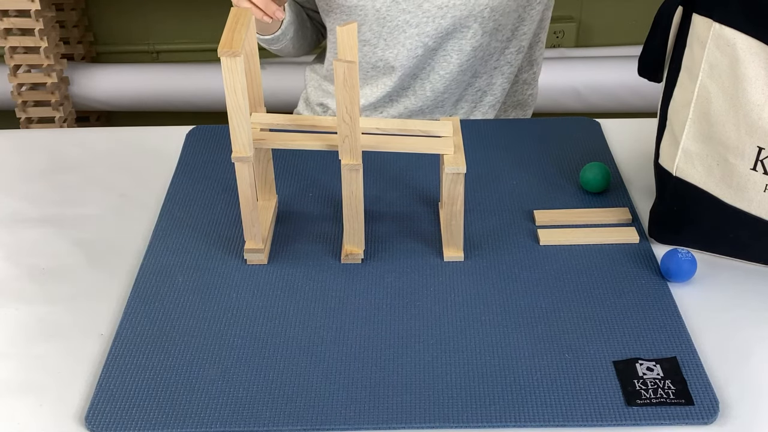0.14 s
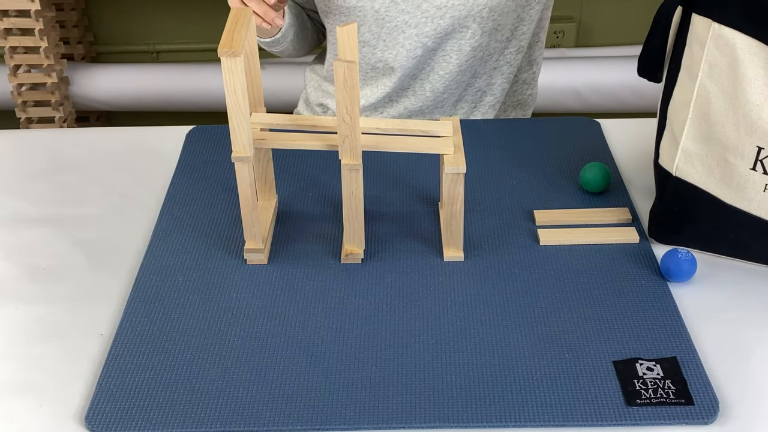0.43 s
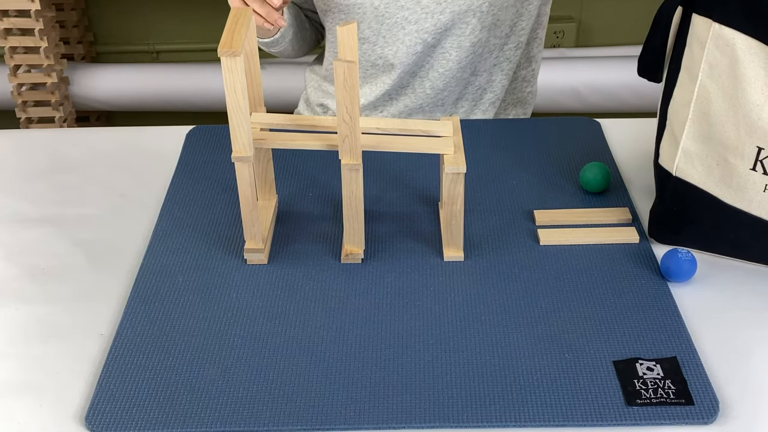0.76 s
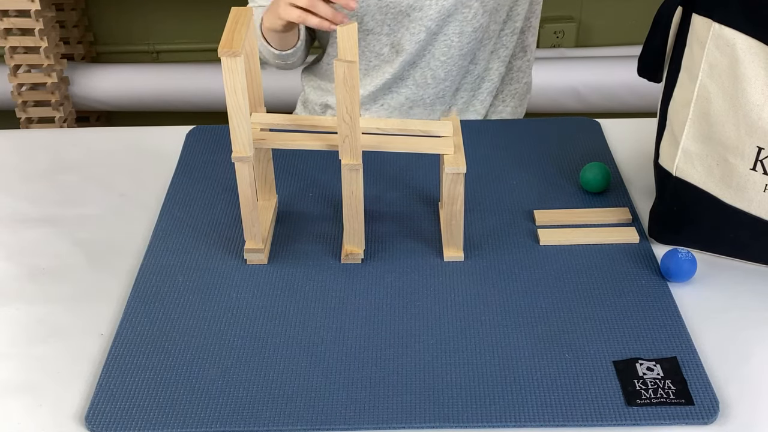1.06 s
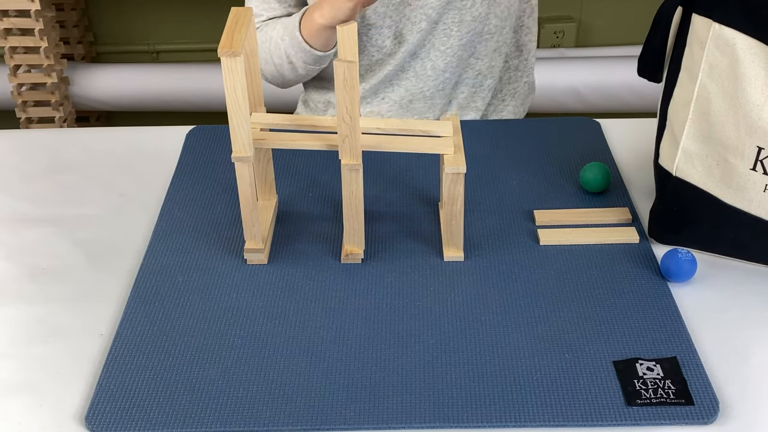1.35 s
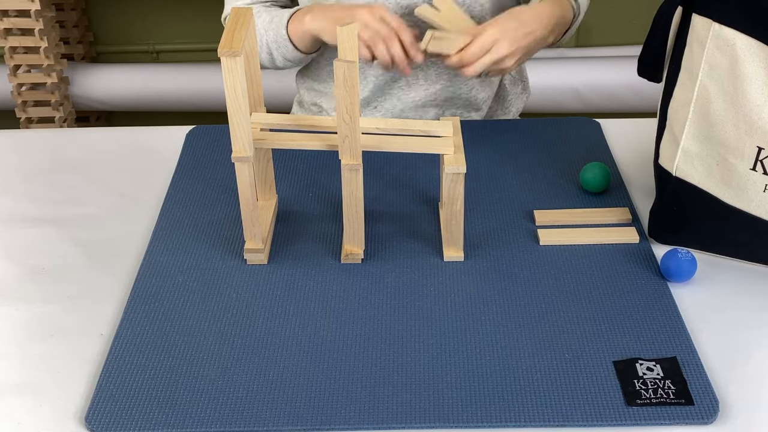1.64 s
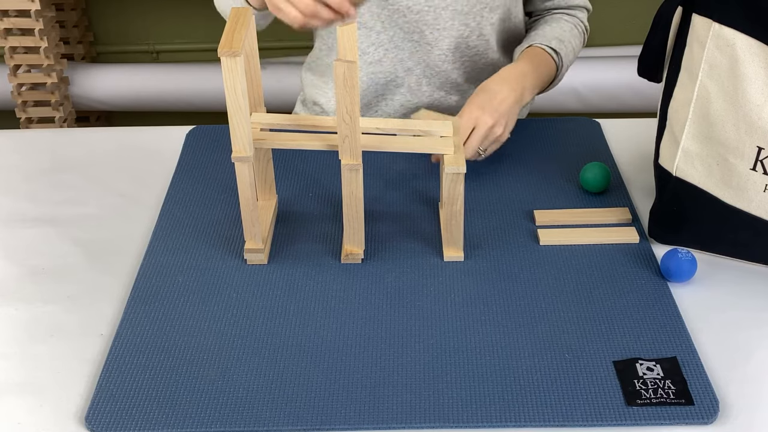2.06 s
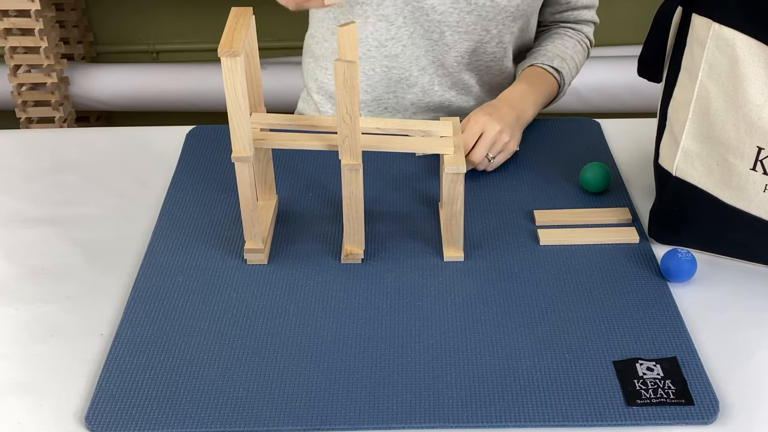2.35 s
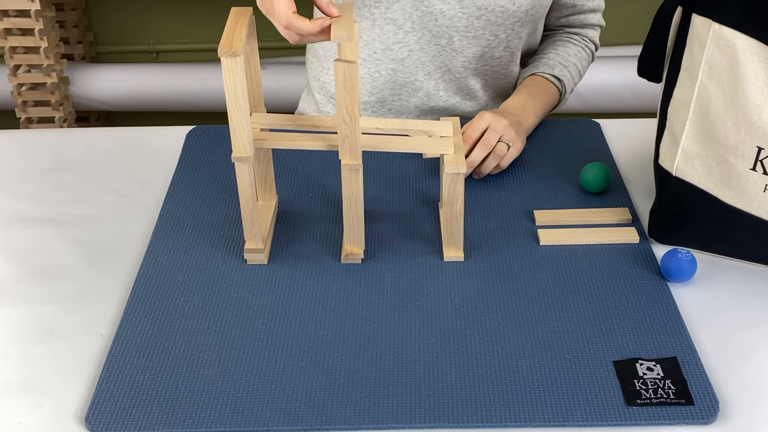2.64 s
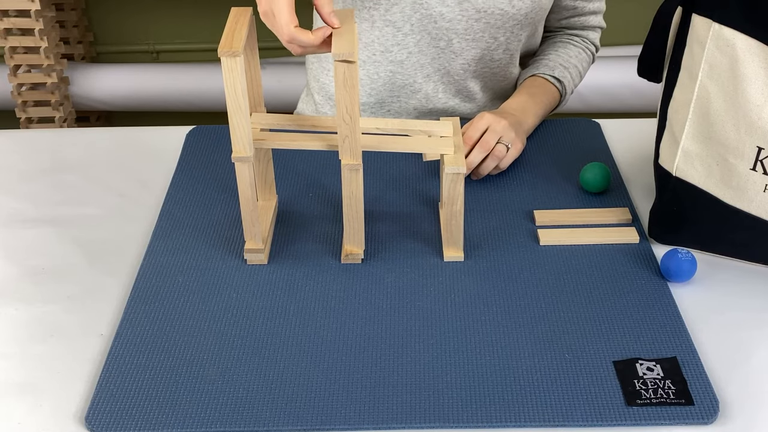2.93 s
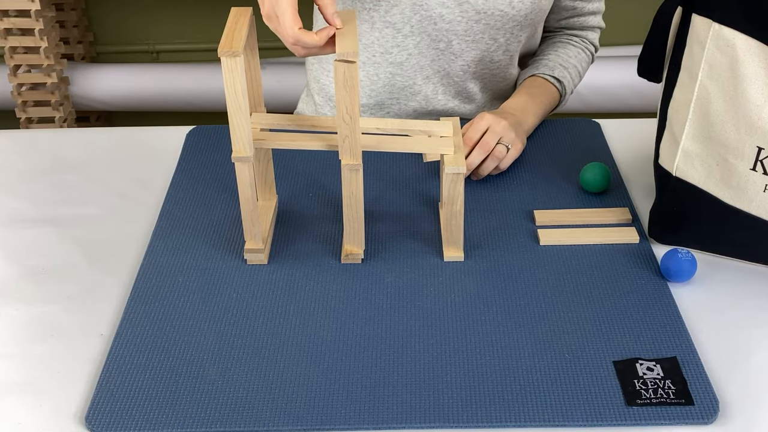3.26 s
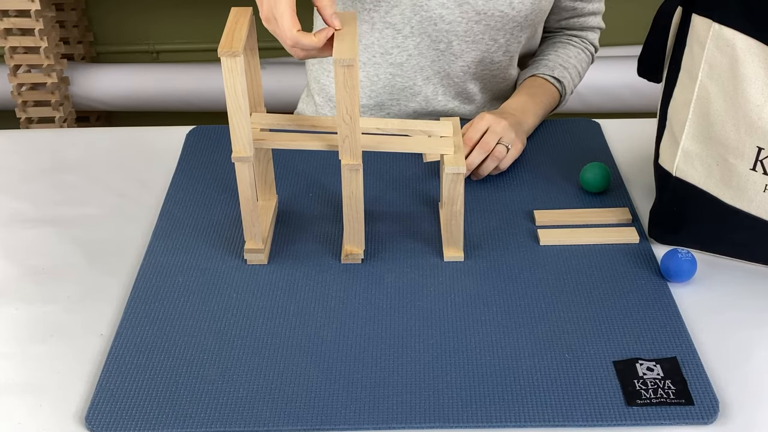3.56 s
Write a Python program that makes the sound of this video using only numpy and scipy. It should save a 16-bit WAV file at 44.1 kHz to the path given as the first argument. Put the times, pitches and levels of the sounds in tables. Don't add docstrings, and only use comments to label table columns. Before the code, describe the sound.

Small wooden planks knock and grind as a hand lifts a heap and lets it settle, then sparse faint slides, a soft set-down and a last nudge, heard close in a quiet room with low ventilation rumble.

```python
import sys
import numpy as np
from scipy import signal
from scipy.fft import rfft, irfft
from scipy.io import wavfile
from scipy.ndimage import uniform_filter1d

SR = 44100
rng = np.random.default_rng(int(sys.argv[2]) if len(sys.argv) > 2 else 0)


def store_pcm(level_fs):
    pcm = np.round(np.clip(level_fs, -1, 1) * 32767).astype(np.int16)
    wavfile.write(sys.argv[1], SR, np.atleast_2d(pcm).T)


def volts(x):
    e = np.asarray(x, float) / 20
    return 10 ** e


N = 163170

# start_s, peak_db, low_pitch_hz, high_pitch_hz, high_share_db
HEAP_KNOCKS = [(0.055, -41, 2298, 6617, -36.5), (0.1104, -38, 2756, 1500, -9.5),
               (.1244, -34, 2364, 6200, -13.5), (0.15, -34.5, 1946, 4021, -19),
               (0.172, -29.5, 2730, 7814, -35.5), (.187, -36.5, 2222, 5444, -26),
               (.1976, -33, 2594, 6060, -26.5), (0.2295, -17, 2628, 6189, -10),
               (0.2563, -25, 1869, 5280, 6), (0.2663, -23, 2747, 5280, -6.5), (0.2729, -26, 1996, 5280, -7),
               (0.3226, -38, 2210, 5280, -18.5), (0.3382, -33, 2501, 5280, -23.5),
               (0.3572, -30, 2447, 6139, -20.5), (0.3877, -31, 2432, 6798, -36),
               (0.402, -30.5, 2332, 6797, -23), (0.437, -35.5, 2516, 6697, -8),
               (0.4743, -45, 3683, 4546, -21.5), (.487, -27, 2870, 5480, -15),
               (0.4898, -20.5, 2680, 6200, -18),
               (0.5201, -32.5, 2825, 6170, -15.5), (0.59, -34.5, 1719, 6460, -15),
                 (0.5972, -31, 2498, 6200, -10.5), (0.6292, -30, 2758, 6700, -20),
                 (0.6624, -30, 2740, 6150, -11.5), (0.7084, -33, 2531, 3340, -7.5),
                 (0.725, -23, 2456, 6420, -3.5), (0.7355, -23.5, 3293, 5770, -7.5),
                 (0.7589, -22, 3154, 7380, 1.5), (0.7827, -35, 2801, 7410, -14.5),
                 (0.8058, -14, 2740, 3680, -8.5), (0.8135, -28.5, 5242, 7520, -3),
                 (0.8315, -28, 2498, 6380, -13), (.846, -38.5, 3678, 7360, -9),
                 (0.8632, -31.5, 2540, 3720, -15), (0.8705, -22, 2543, 6350, -20.5)]
# start_s, peak_db, low_pitch_hz, high_pitch_hz, high_share_db
SET_DOWNS = [
    (1.614, -61.5, 3030, 8116, -12.5),
    (2.0715, -37, 3204, 7699, -23),
]
# pitch_hz, level_db (per Hz)
CRACK_COLOUR = [(400, 4), (1900, -3), (3500, -6), (7500, -15), (10300, -28), (12700, -28), (14500, -41)]
# start_s, level_db, brightness_db (per octave)
NUDGES = [
    (3.5291, -48, -8.5),
    (3.54, -63.5, -7),
    (3.619, -43.5, 3),
]
# pitch_hz, level_db, fade_60db_s
LAST_PLANK = [(1723.5, -7, 0.01182), (2349.1, -0.5, 0.03627), (2870, -14, 0.0543), (4030.7, -8, 0.0308),
              (6117.5, -14, 0.0279), (6677, -22.5, 0.03316), (7410, -20.5, 0.01733)]
# start_s, peak_db, pitch_hz
TAPS = [(.103, -32.5, 1201), (.111, -25, 1492), (.1495, -26, 1201), (.141, -29, 548.3),
        (0.988, -35.5, 701.1), (1.39, -50, 1314), (2.0697, -30.5, 681.4), (2.071, -34, 1128),
        (2.259, -43, 544.2), (2.6088, -32, 1132), (3.5292, -44, 916), (3.6189, -38, 842.4)]
# start_s, level_db, pitch_hz, fade_60db_s
THUDS = [
    (0, -51, 646.5, .07),
    (0, -40.5, 208.9, 0.2102),
    (.485, -25.5, 85.54, 0.03836),
    (.735, -34, 144, 0.1492),
    (2.0702, -31.5, 132.5, 0.04394),
    (2.071, -43, 247.4, 0.02566),
    (3.62, -46.5, 97.46, 0.1022),
]
# start_s, level_db, pitch_hz
TICKS = [(0.2296, -53.5, 11550), (.268, -50.5, 12520), (.27, -38.5, 9900), (.276, -42.5, 9854),
         (0.277, -49.5, 12930), (.276, -54.5, 14630), (.275, -37, 8086), (0.4938, -56, 11720),
         (0.7256, -49, 11990), (.7258, -40.5, 8177), (.7592, -43, 11090), (.7592, -55.5, 14510),
         (.8062, -39.5, 12140), (.8062, -38, 7820), (0.8059, -32, 5388), (.8135, -43.5, 12720),
         (0.8141, -47, 9419)]
# start_s, length_s, level_db, pitch_hz
RUBS = [(.127, 0.01838, -43, 2450), (.168, 0.01486, -44.5, 2666), (.184, 0.01008, -35.5, 2300),
        (0.198, 0.01036, -42, 2600), (0.223, 0.01154, -35, 2500), (0.234, 0.00776, -37, 6190),
        (0.24, 0.01277, -34.5, 2650), (.258, 0.00363, -37.5, 5280), (.267, 0.01109, -33.5, 5280),
        (.268, 0.00811, -34.5, 2770), (0.273, 0.011785, -39.5, 1960), (0.337, 0.0111, -36, 2450),
        (.388, 0.01766, -37, 2400), (.6, 0.00749, -39.5, 2500), (.63, 0.01179, -40, 2700),
        (0.714, 0.00602, -36, 2600), (.728, 0.01355, -36, 2400), (0.764, 0.01, -37, 7380),
        (0.782, 0.01339, -31, 2780), (0.817, .008, -30.5, 2700), (0.832, 0.01862, -32.5, 2430),
        (0.85, 0.03532, -43, 3690), (0.864, 0.00744, -31, 2500), (.872, 0.012, -28, 2500),
        (0.883, .022, -45, 2490), (.92, 0.039, -57.5, 2490), (2.33, 0.07733, -64.5, 3108),
        (2.612, 0.02811, -66, 5299), (2.612, 0.02789, -62.5, 2060), (.8065, 0.0044, -30.5, 2709),
        (3.46, 0.25236, -53, 377.1)]
# time_s, grind_db, rumble_db
EFFORT = [(0, -63, -49), (.095, -86.5, -56), (.145, -50, -39.5), (0.198, -40.5, -40), (.28, -61, -44),
          (0.371, -50.5, -39), (0.451, -54.5, -50), (0.498, -43.5, -47.5), (0.548, -60.5, -45.5),
          (.66, -47, -38), (0.699, -51, -40.5), (.75, -36, -36), (.88, -67.5, -43), (.93, -64.5, -64.5),
          (1.0, -71.5, -65.5), (1.3, -86, -71.5)]
# pitch_hz, width_hz, level_db
HEAP_MODES = [(1696, 37, -5), (2740, 319.2, 19), (3206.1, 140, -14), (3680, 44, 7), (5280, 35, -4),
              (6200, 50, -10), (7380, 61, -11), (8250, 51, -3)]
# pitch_hz, level_db (per Hz)
GRIND_COLOUR = [(500, -18), (1500, 0), (2700, 0), (4500, -12), (7500, -15), (9000, -27.5), (15500, -36)]
# pitch_hz, level_db (per Hz)
RUMBLE_COLOUR = [(40, -1.5), (200, 0), (430, -7.5), (520, -16), (1000, -15)]
# start_s, length_s, level_db, low_pitch_hz, high_pitch_hz
SLIDES = [(1.376, 0.08422, -76.5, 2465, 1520), (1.611, 0.071, -84, 8250, 6363),
          (1.703, 0.1836, -81, 6040, 3500), (2.124, 0.0937, -76.5, 3200, 12100),
          (2.189, 0.13185, -78, 3271, 6200), (2.319, 0.146, -77, 7229, 3310),
          (2.461, 0.10704, -79, 7177, 3285), (2.541, 0.12553, -76, 7099, 7900),
          (2.43, 0.12996, -77.5, 4274, 2007), (2.602, 0.04103, -74.5, 7940, 12700),
          (2.076, 0.02826, -73, 7288, 7950), (2.244, 0.02292, -76, 3217, 6200)]
# pitch_hz, fade_60db_s
ROOM_FADE = [(200, 0.8386), (1000, 0.16), (3000, 0.21729), (5500, 0.3684), (10000, 0.39142)]
# pitch_hz, level_db (per Hz)
AIR_COLOUR = [(30, 6.5), (60, -2), (85, 0), (130, -2.5), (370, -7), (600, -16), (1500, -24.5), (3000, -34)]
# pitch_hz, level_db
FAN_TONES = [(40.12, -56), (42.39, -71), (44.71, -64), (46.85, -60)]
# pitch_hz, level_db
HUM_TONES = [(119.7, -74.5), (135.9, -64.5), (179.75, -70.5), (239.68, -63)]

LOW_WIDTH_HZ, HIGH_WIDTH_HZ, SIDE_WIDTH_HZ = 95, 140, 220
LINGER_WIDTH_HZ, LINGER_DB = 50, -2
SOFT_WIDTH_HZ = 1110
CHATTER_S, CHATTER_DB = 0.004, -8.5
CRACK_DB, CRACK_FADE_S, SIDE_DB = -5.5, 0.09, -3
SET_DOWN_DAMP = 4.482
TICK_RING_S, TICK_SNAP_DB = 0.012, -3
RUB_WIDTH_HZ = 150
SLIPS_PER_S, SLIP_SPREAD_DB = 900, 6.5
GRIND_RING_DB, GRIND_HISS_DB = -4.5, 0.5
ROOM_DB = -9.5
AIR_DB, FAN_DB, HISS_DB = -61, 3, -72
BEAT_S = 2.79
DUCT_HZ, DUCT_DB = 363.1, -71.5
EDGE_HZ = 15750


def evened(x):
    return x / np.sqrt(np.mean(x ** 2) + 1e-20)


def peaked(x):
    return x / abs(x).max()


def read(points, hz):
    f, value = np.transpose(points)
    return np.interp(np.log(hz + 1), np.log(f + 1), value)


def add(mix, start_s, sound):
    part = mix[round(start_s * SR):][:len(sound)]
    part += sound[:len(part)]


def colour(x, points):
    hz = np.fft.rfftfreq(len(x), 1 / SR)
    low_end = np.minimum(hz / points[0][0], 1) ** 2
    high_end = np.minimum(points[-1][0] / (hz + 1), 1) ** 2
    shape = volts(read(points, hz)) * low_end * high_end
    return evened(irfft(rfft(x) * shape, len(x)))


def resonate(x, hz, width_hz):
    r = np.exp(-np.pi * width_hz / SR)
    angle = 2 * np.pi * hz / SR
    return signal.lfilter([1 - r], [1, -2 * r * np.cos(angle), r * r], x) * 2 * np.sin(angle)


def ring(t, hz, fade_s):
    return np.sin(2 * np.pi * hz * t) * volts(-60 * t / fade_s)


def slips(count, per_s):
    u = rng.random((count, 3))
    happens = u[:, 0] < per_s / SR
    size = volts(-SLIP_SPREAD_DB * np.log(u[:, 1] + 0.0041))
    return happens * size * np.sign(u[:, 2] - 0.5)


def mode(x, hz, width_hz):
    return resonate(x, hz, width_hz) + volts(LINGER_DB) * resonate(x, hz, LINGER_WIDTH_HZ)


def knock(db, low_hz, high_hz, high_db, damp=1):
    t, u = np.arange(4000) / SR, rng.random(8)
    noise = colour(rng.standard_normal(4000), CRACK_COLOUR)
    chatter = np.clip(slips(4000, 3000), -3, 3) * np.exp(-t / CHATTER_S)
    force = volts(CHATTER_DB) * chatter + np.exp(-t / 0.0001)

    soft = resonate(force, low_hz, SOFT_WIDTH_HZ)
    near_hz = low_hz * (0.914 + 0.16 * u[0])
    low = mode(soft, low_hz, LOW_WIDTH_HZ) + volts(-7) * resonate(soft, near_hz, LOW_WIDTH_HZ)
    high = mode(resonate(force, high_hz, 2 * SOFT_WIDTH_HZ), high_hz, HIGH_WIDTH_HZ)
    body = peaked(low) + volts(high_db + 1) * peaked(high)

    for ratio, w in zip((0.607, 1.3, 1.4, 2.6), u[1:5]):
        side = resonate(force, low_hz * ratio, 1432.7)
        side = resonate(side, low_hz * ratio * (0.95 + 0.15 * w), SIDE_WIDTH_HZ)
        side_db = SIDE_DB - 14 * w + (ratio > 1.3) * (high_db - 5.5) / 2
        body = body + volts(side_db) * peaked(side)

    crack = noise + volts(high_db + 10) * evened(np.gradient(noise))
    crack = crack * 0.27 * (1 - np.exp(-t / 0.00021))
    crack = volts(CRACK_DB - 60 * t / CRACK_FADE_S) * crack
    damping = np.exp(-(damp - 1) * t * LOW_WIDTH_HZ)
    return volts(db) * peaked(damping * (body + crack))


def knocks():
    out = np.zeros(N)
    for start_s, *settings in HEAP_KNOCKS:
        add(out, start_s, knock(*settings))
    for start_s, *settings in SET_DOWNS:
        add(out, start_s, knock(*settings, damp=SET_DOWN_DAMP))
    return out


def nudges():
    out, t = np.zeros(N), np.arange(4000) / SR
    onset = 1 - np.exp(-t / 0.000446)
    for start_s, db, tilt_db in NUDGES:
        tone = sum(volts(db + mode_db + tilt_db * np.log2(hz / 2370)) * ring(t, hz, fade_s)
                   for hz, mode_db, fade_s in LAST_PLANK)
        add(out, start_s, onset * tone)
    return out


def taps():
    out, t = np.zeros(N), np.arange(4000) / SR
    for start_s, db, hz in TAPS:
        onset = np.minimum(t * hz * 2, 1)
        tone = ring(t, hz, 2.3395 / hz) + 0.2 * ring(t, 2.29 * hz, 3.529 / hz)
        add(out, start_s, -volts(db + 7) * onset * tone)
    return out


def thuds():
    out, t = np.zeros(N), np.arange(4000) / SR
    for start_s, db, hz, fade_s in THUDS:
        tone = ring(t, hz, fade_s) + 1.4 * ring(t, 2.3 * hz, 0.14775 * fade_s)
        add(out, start_s, -volts(db) * tone)
    return out


def ticks():
    out, t = np.zeros(N), np.arange(2000) / SR
    onset = np.minimum(t / 0.0003915, 1)
    for start_s, db, hz in TICKS:
        snap = resonate(rng.standard_normal(2000), hz, 2500) * np.exp(-t / 0.0012)
        tick = onset * ring(t, hz, TICK_RING_S) + volts(TICK_SNAP_DB) * peaked(snap)
        add(out, start_s, volts(db + 5.5) * tick)
    return out


def rubs():
    out = np.zeros(N)
    for start_s, length_s, db, hz in RUBS:
        t = np.arange(max(4000, round(length_s * SR))) / SR
        stroke = np.sin(np.pi * np.clip(t / length_s, 0, 1) ** 0.7) ** 0.68
        rubbed = resonate(stroke * rng.standard_normal(len(t)), hz, 580)
        sung = resonate(rubbed, hz, RUB_WIDTH_HZ)
        add(out, start_s, volts(db + 2) * peaked(sung))
    return out


def heap():
    count = round(1.4 * SR)
    t = np.arange(count) / SR
    modes = np.zeros(count)
    for hz, width_hz, db in HEAP_MODES:
        push = resonate(np.clip(slips(count, SLIPS_PER_S / 2), -6, 6), hz, 1489.9)
        modes += volts(db) * evened(resonate(push, hz, max(width_hz, 90)))
    modes = evened(modes)

    hiss = colour(np.clip(slips(count, 12 * SLIPS_PER_S), -4, 4), GRIND_COLOUR)
    hiss = evened(hiss * uniform_filter1d(abs(modes) + 0.4, size=120))
    grind = volts(GRIND_RING_DB) * modes + volts(GRIND_HISS_DB) * hiss
    rumble = colour(rng.standard_normal(count), RUMBLE_COLOUR)

    time_s, grind_db, rumble_db = np.transpose(EFFORT)
    grind = grind * volts(np.interp(t, time_s, grind_db, right=-99))
    rumble = rumble * volts(np.interp(t, time_s, rumble_db, right=-99))
    out = np.zeros(N)
    add(out, 0, grind + rumble)
    return out


def slides():
    out = np.zeros(N)
    for start_s, length_s, db, low_hz, high_hz in SLIDES:
        count = round(length_s * SR)
        unsteady = volts(1.1703 * evened(uniform_filter1d(rng.standard_normal(count), 500)))
        rub = np.clip(slips(count, 9000), -3, 3) * unsteady
        low = evened(resonate(rub, low_hz, 250))
        high = evened(resonate(rub, high_hz, 400))
        scrape = evened(resonate(rub, 5178, 11000))
        tone = low + volts(-2.5) * high + volts(5) * scrape
        swell = np.sin(np.pi * (np.arange(count) / count) ** 0.5982)
        add(out, start_s, volts(db) * tone * swell)
    return out


def room(x):
    echoes = np.zeros(SR)
    at = np.arange(260, SR - 20, 20)
    echoes[at + rng.integers(0, 20, len(at))] = rng.choice([-1., 1.], len(at))
    hz, t, z = signal.stft(echoes, SR, nperseg=256)
    fade = volts(-60 * t / read(ROOM_FADE, hz)[:, None])
    tail = signal.istft(z * fade, SR, nperseg=256)[1]
    return signal.fftconvolve(x, tail / np.linalg.norm(tail))[:N]


def air():
    t = np.arange(N) / SR
    out = volts(AIR_DB) * colour(rng.standard_normal(N), AIR_COLOUR)
    out += volts(HISS_DB) * rng.standard_normal(N)
    for hz, db in FAN_TONES:
        out += volts(db + FAN_DB) * np.cos(2 * np.pi * hz * (t - BEAT_S))
    for hz, db in HUM_TONES:
        out += volts(db) * np.sin(2 * np.pi * (hz * t + rng.random()))
    whistle = evened(resonate(rng.standard_normal(N), DUCT_HZ, 14))
    return out + volts(DUCT_DB) * whistle


def scene():
    wood = knocks() + nudges() + taps() + thuds() + ticks() + rubs() + heap() + slides()
    return (wood + volts(ROOM_DB) * room(wood) + air())[None]


def top_cut(x):
    return signal.sosfilt(signal.butter(12, 16430, fs=SR, output="sos"), x)


def record(dry):
    low_pass = signal.firwin(511, EDGE_HZ, window=("kaiser", 9), fs=SR)
    cut = signal.oaconvolve(dry, low_pass[None], "same")
    return top_cut(cut)


dry = scene()
out = record(dry)
store_pcm(out)
```